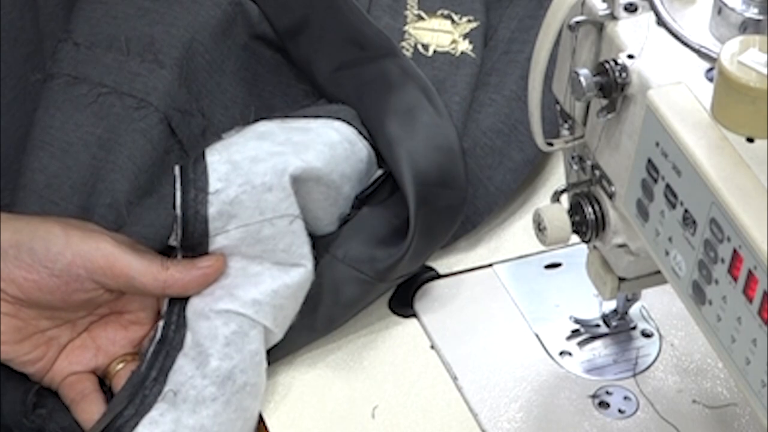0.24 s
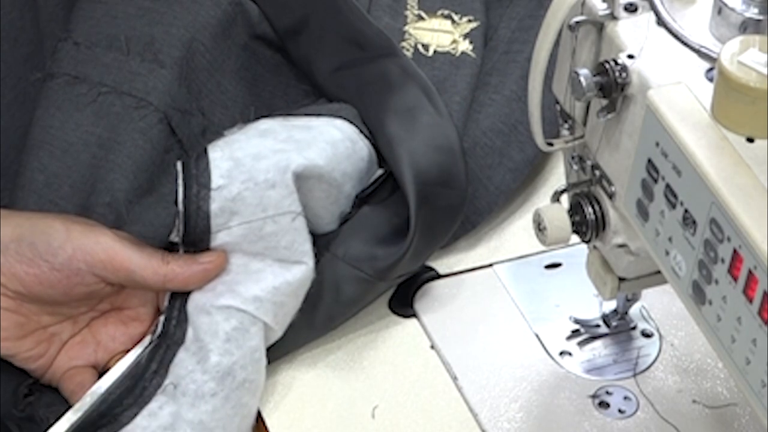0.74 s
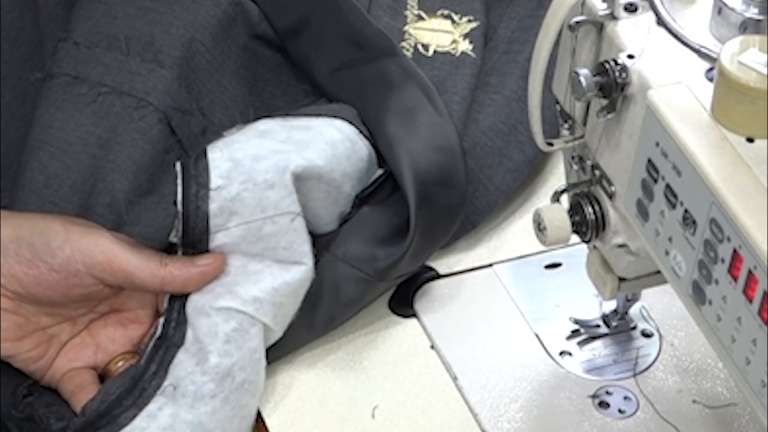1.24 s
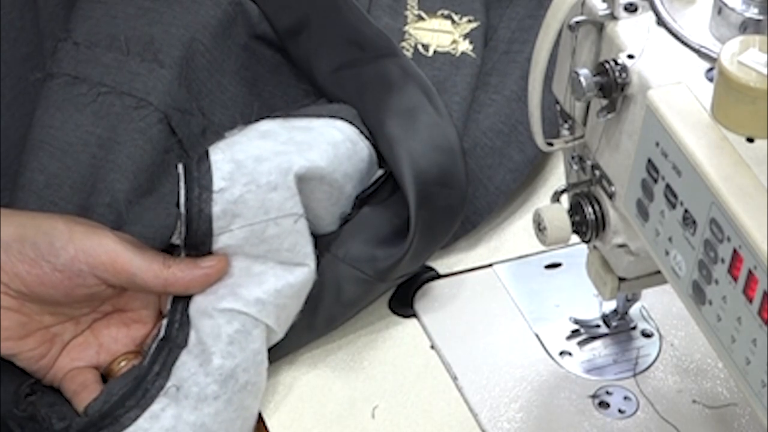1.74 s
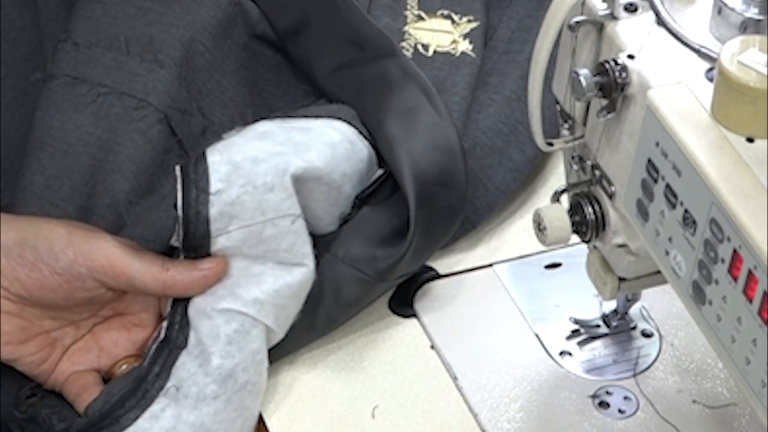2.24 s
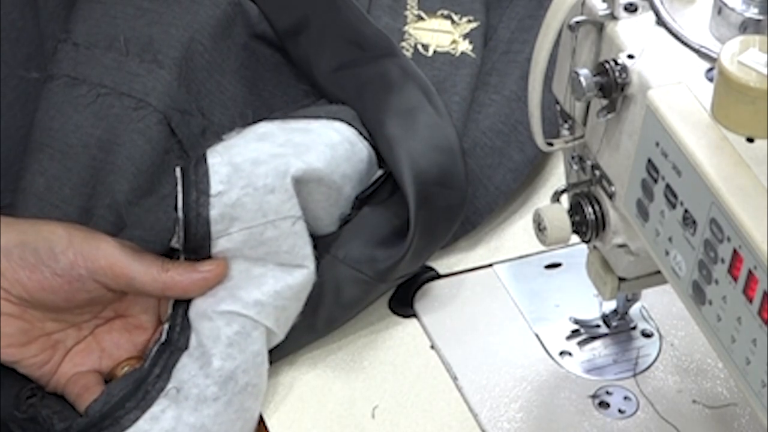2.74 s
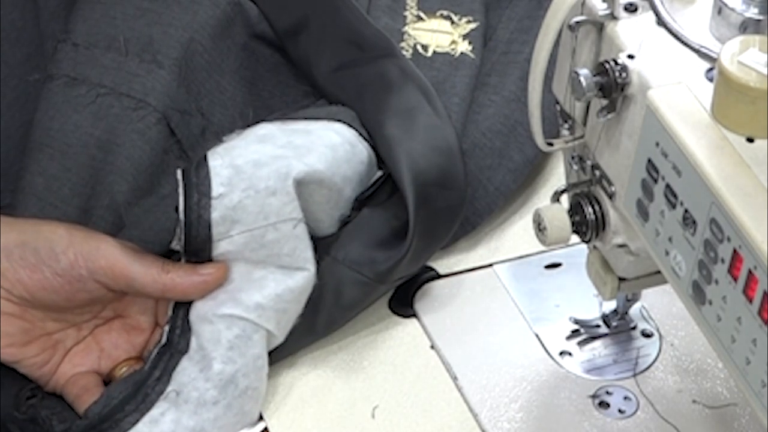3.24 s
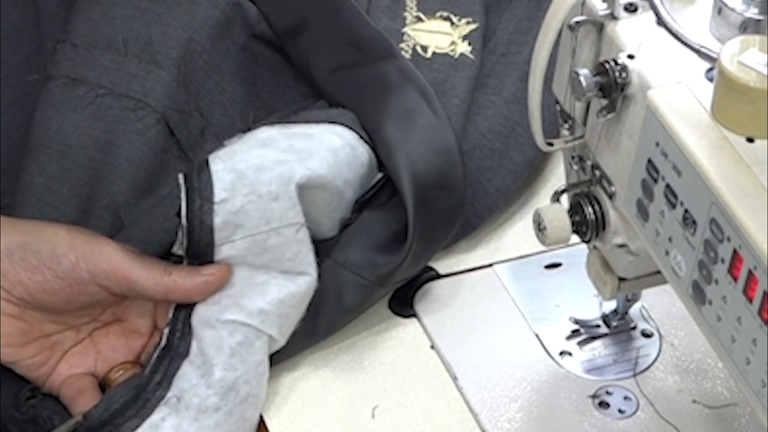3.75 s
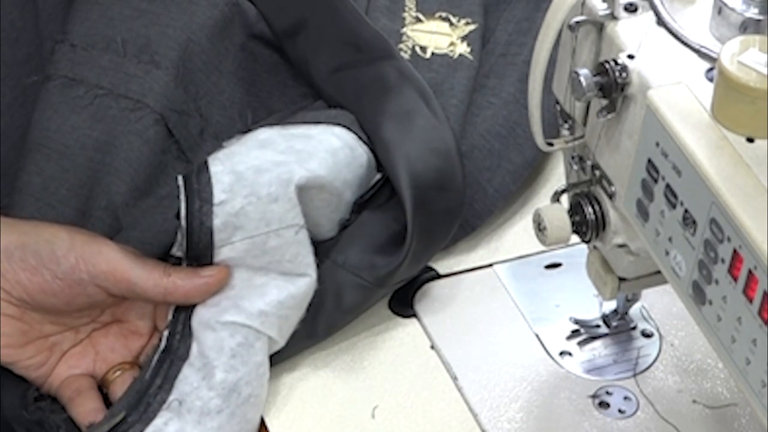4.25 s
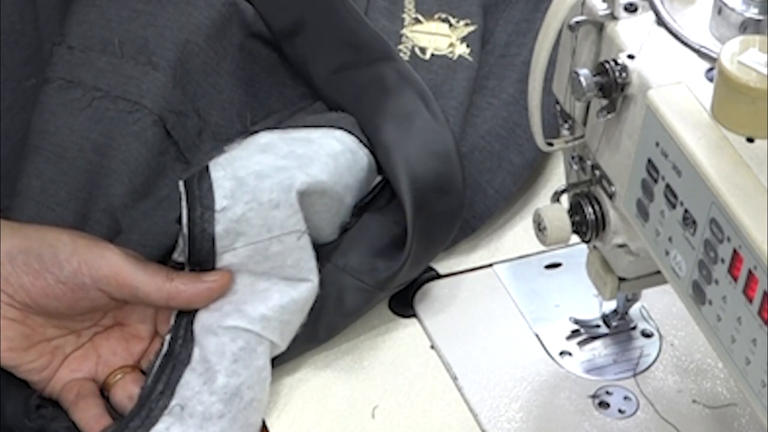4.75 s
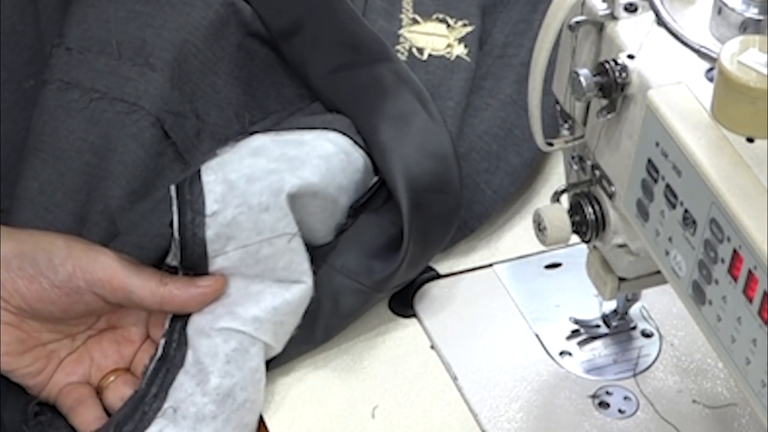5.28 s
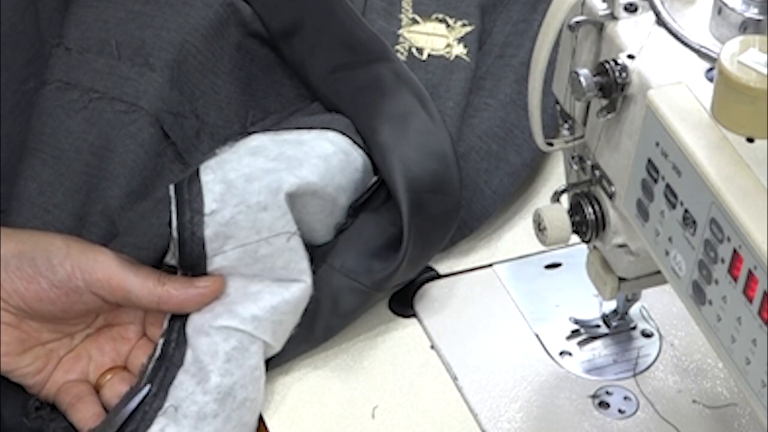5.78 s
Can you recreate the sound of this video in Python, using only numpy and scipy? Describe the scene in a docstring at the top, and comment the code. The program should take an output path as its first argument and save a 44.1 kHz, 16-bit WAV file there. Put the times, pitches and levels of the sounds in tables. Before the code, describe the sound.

Close by, steel scissors trim a jacket seam in a small workshop. Three light snips come first, the blades ringing briefly and rubbing as they reopen. One hard snap with a short grind follows, then three quick, crisp cuts through cloth and a softer last one. An idling sewing machine hums and fans rush throughout, dipping at the hardest snap and slowly swelling back.

```python
"""Steel scissors trim a jacket seam in a small workshop; fans rush and a sewing machine idles throughout.
First come three light snips: the blades snap shut and ring, and rub as they open again.
At 2.3 s the hardest snap drives them past each other, grinding, and ducks the limiter.
Three quick cuts follow, each a bite into cloth, a shear and a snap, then a softer one at 4.7 s.
Meanwhile the limiter lets go and the hum swells back over several seconds."""
import sys
import numpy as np
from scipy import signal
from scipy.fft import rfft, irfft
from scipy.io import wavfile
from scipy.ndimage import uniform_filter1d

SR = 44100
rng = np.random.default_rng(int(sys.argv[2]) if len(sys.argv) > 2 else 0)


def wrap_up_sound(samples):
    """Save the sound to the file named by the first command line argument, as 16-bit audio."""
    columns = np.atleast_2d(samples).T
    # keep every value between -1 and 1, then stretch to whole-number steps
    tamed = np.clip(columns, -1, 1)
    steps = np.round(tamed * 32767).astype(np.int16)
    wavfile.write(sys.argv[1], SR, steps)


N = 265305
TIME = np.arange(N) / SR


def from_db(db):
    """Decibels to gain."""
    return 10 ** (np.asarray(db) / 20)


def unit_rms(x):
    """Scale to rms 1."""
    return x / np.sqrt(np.mean(x ** 2) + 1e-20)


def gain_at(points, hz):
    """Gain from (f/Hz, level/dB) points, interpolated over log frequency."""
    knots_hz, db = np.transpose(points)
    return from_db(np.interp(np.log(hz + 1e-6), np.log(knots_hz), db))


def drift(rate_hz):
    """Slow random line through unit-variance knots."""
    knots = rng.standard_normal(int(N / SR * rate_hz) + 2)
    return np.interp(TIME * rate_hz, np.arange(len(knots)), knots)


def resonate(x, hz, width_hz):
    """Two-pole resonance, peak gain 1."""
    r = np.exp(-np.pi * width_hz / SR)
    b = np.array([1, 0, -1]) * (1 - r * r) / 2
    a = [1, -2 * r * np.cos(2 * np.pi * hz / SR), r * r]
    return signal.lfilter(b, a, x + 1e-18)


def butter(x, hz, kind, order=2):
    """Low-pass or high-pass."""
    return signal.sosfilt(signal.butter(order, min(hz, .45 * SR), kind, fs=SR, output="sos"), x)


def add(out, at_s, sound):
    """Mix a sound into both channels."""
    start = round(at_s * SR)
    out[:, start:start + sound.shape[1]] += sound[:, :N - start]


# fan rush before roll-off: f/Hz, density/(dB per Hz)
FAN_SPECTRUM = [(12, -91), (28, -65), (46, -67), (66, -57.5), (100, -66.5), (140, -57), (188, -64),
                (228, -61.5), (325, -68.5), (450, -64.5), (800, -67.5), (1150, -71.5), (2050, -74.5),
                (4000, -83)]
# hiss before combing: f/Hz, density/(dB per Hz)
HISS_SPECTRUM = [(2000, -112.5), (3800, -86.5), (5500, -82.5), (7300, -81.5), (9000, -84.5), (10300, -87.5),
                 (12800, -86.5), (14200, -93), (16000, -104.5)]
# stereo width: f/Hz, side minus mid/dB
AIR_WIDTH = [(25, -34), (60, -46), (130, -58), (280, -27.5), (550, -18), (1100, -15), (1800, -15),
             (3000, -31.5), (4500, -32.5), (6000, -13.5), (9000, -7), (13000, 2)]

def ventilation(rolloff_hz=4500, comb_decay_s=.012):
    """Fan rush and thin hiss, wider in the treble; hard surfaces nearby comb the hiss."""
    hz = np.linspace(0, SR / 2, N // 2 + 1)
    t = TIME[:SR // 50]
    reflections = rng.standard_normal(len(t)) * np.exp(-t / comb_decay_s) * (t > .002)
    comb = np.abs(.84 + .54 * rfft(reflections / np.linalg.norm(reflections), N))
    rush = gain_at(FAN_SPECTRUM, hz) / np.hypot(1, (hz / rolloff_hz) ** 2)
    hiss = gain_at(HISS_SPECTRUM, hz) * comb
    mid, side = rfft(rng.standard_normal((2, N))) * np.hypot(rush, hiss) * np.sqrt(SR / 2)
    return irfft(mid + gain_at(AIR_WIDTH, hz) * side * [[1], [-1]], N)


# motor and mains hum, faint whine on top: f/Hz, rms level/dB
HUM_LINES = [(61.5, -55), (74, -50), (98, -41), (120, -39.5), (142.2, -39.5), (164, -53.5), (240, -50.5),
             (360, -57.5), (382, -54), (457, -56.5), (840.5, -55.5), (1702, -90), (4334, -66), (5533, -63),
             (5840, -68)]

def motor(waver_db=1.7, wander_rad=.25):
    """Idling motor: steady lines, each wavering in level and phase."""
    out = 0
    for hz, db in HUM_LINES:
        phase = 2 * np.pi * (hz * TIME + rng.random()) + wander_rad * drift(2.983)
        out += np.sqrt(2) * from_db(db + waver_db * drift(4)) * np.sin(phase)
    return out


def room(x, t60_s=.22, level_db=-9, side_db=-17, first_s=.0031, wall_hz=15000):
    """Dense reflections from table, machine and walls, dying quickly among the cloth."""
    t = TIME[:SR // 2]
    decay = from_db(-60 * t / t60_s) * (t > first_s)
    mid, side = butter(rng.standard_normal((2, len(t))), wall_hz, "low", order=1) * decay
    echoes = unit_rms(mid + from_db(side_db) * side * [[1], [-1]]) / np.sqrt(len(t))
    return from_db(level_db) * signal.fftconvolve(x.mean(axis=0)[None], echoes, axes=1)[:, :N]


# blade tip modes: f/Hz, relative level/dB
TIP_MODES = [(4700, -7.5), (6900, -7), (7500, 4), (7930, -10), (8700, -10), (9030, 3), (9760, -5),
             (10950, 18), (12950, -14)]

def tip_ring(x, t60_s=.036, ring_db=-9):
    """The free blade tips ring on softly."""
    width_hz = np.log(1000) / (np.pi * t60_s)
    return sum(from_db(db + ring_db) * resonate(x, hz, width_hz) for hz, db in TIP_MODES)


# closed blades, damped by hand and cloth: f/Hz, width/Hz, level/dB
CLOSED_MODES = [(2350, 86, -28), (3670, 100, -9), (4480, 220, -11), (5100, 84, -4.5), (5820, 510, -9.5),
                (6390, 95, -3), (6900, 140, -2), (7580, 420, 0), (8330, 110, 4), (8800, 340, 1.5),
                (9250, 144, 2.5), (9700, 220, 0), (10440, 780, -7), (12020, 410, 1), (13600, 300, 0),
                (13600, 590, -3.5), (15000, 880, -7)]
# parted blades: f/Hz, width/Hz, level/dB
PARTED_MODES = [(3160, 114, -3), (4530, 190, 0.5), (5500, 280, -9.5), (6260, 120, 0), (6830, 220, -4),
                (7240, 180, -1.5), (8000, 130, -5), (8730, 400, -6.5), (9580, 180, -5), (9900, 450, -16),
                (11370, 280, -8), (12100, 400, -6), (13220, 350, -8.5), (14700, 500, -13)]

def blades(force, modes, crack_db, low_cut_hz=2000):
    """Contact force rings the modes and radiates a direct crack; narrow steel gives little bass."""
    rings = sum((-1) ** k * from_db(db) * resonate(force, hz, width_hz)
                for k, (hz, width_hz, db) in enumerate(modes))
    return butter(rings + from_db(crack_db) * force, low_cut_hz, "high")


def rub(out, at_s, db, half_s, hz, modes=PARTED_MODES, catches_per_s=5000):
    """Edges catch and slip in dense tiny grains under one swell of pressure."""
    t = np.arange(-3 * half_s, 6 * half_s, 1 / SR)
    pressure = np.exp(-(t / half_s) ** 2 / 2)
    grains = rng.standard_normal(SR) * (rng.random(SR) < catches_per_s / SR)
    steel = blades(grains[:len(t)] * pressure, modes, crack_db=-18)
    scrape = unit_rms(resonate(steel, hz, width_hz=2000) + .4 * steel)
    add(out, at_s + t[0], from_db(db) * scrape[None] * np.sqrt(np.mean(pressure ** 2)))


# knocks on the stop: t/s, level/dB, half length/s
STOP_KNOCKS = [(0.524, -39, 0.011), (1.003, -38, .0077), (2.172, -26.5, .0014), (2.635, -21.5, .0019),
               (2.932, -22.5, 0.0027), (3.222, -23, .003), (3.514, -37.5, .012), (4.583, -41, 0.0044),
               (4.877, -40, 0.0055)]

def openings(slide_lead_s=.014):
    """The edges slide apart, soft and bright, then knock against their stop."""
    out = np.zeros((2, N))
    for at_s, db, half_s in STOP_KNOCKS:
        rub(out, at_s - slide_lead_s, db - 14, half_s=.005, hz=8900)
        rub(out, at_s, db, half_s, hz=7800)
    return out


# bites into cloth: t/s, level/dB, half length/s
CLOTH_BITES = [(2.7336, -22.5, 0.0016), (3.027, -20.5, .0028), (3.303, -19, .0032), (4.683, -35.5, .004)]

def cuts():
    """The edges bite into the cloth and shear on towards the next snap."""
    out = np.zeros((2, N))
    for at_s, db, half_s in CLOTH_BITES:
        shut_s, shut_db = next(snap[:2] for snap in SNAPS if snap[0] > at_s)
        stroke_s = shut_s - at_s
        rub(out, at_s, db, half_s, hz=7900)
        rub(out, at_s + .8 * stroke_s, shut_db - 30.5, half_s=.3 * stroke_s, hz=9000)
    return out


# grinds after the hardest snap: delay/s, level/dB, half length/s, f/Hz
GRINDS = [(0.047, -21.5, 0.023, 4700), (0.068, -24.5, 0.016, 9400)]

def overrun():
    """The hardest snap drives the blades past each other; they grind to rest."""
    out = np.zeros((2, N))
    hardest_s = max(SNAPS, key=lambda snap: snap[1])[0]
    for delay_s, db, half_s, hz in GRINDS:
        rub(out, hardest_s + delay_s, db, half_s, hz, CLOSED_MODES)
    return out


def chatter(length_s, grit=.11, bounce=.67, bounces=4):
    """Closing force: first contact, weaker bounces and the grit of parting fibres."""
    t = TIME[:2048]
    force = grit * rng.standard_normal(len(t)) * np.exp(-t / length_s)
    when = (np.arange(bounces) + rng.uniform(.4, 1, bounces)) / bounces
    kicks = bounce * rng.choice([-1, 1], bounces) * np.exp(-when ** 2)
    force[(when * length_s * SR).astype(int)] += kicks
    force[0] += 1
    return force


# blade closings: t/s, level over 3 ms/dB, chatter/s, main ring f/Hz, level/dB,
# second ring f/Hz, level/dB, left minus right/dB
SNAPS = [(0.0553, -21, 0.0013, 8540, 6, 4380, 3, -1), (0.8151, -18.5, 0.0017, 6430, 1.5, 3600, -8, -1),
         (1.1676, -17, .0035, 6710, 9, 3420, -1, -1.5), (2.327, 7, 0.0022, 9300, -4, 2400, -6, 1),
         (2.7591, 0, .0016, 9300, 6, 7960, 5, -1), (3.0467, 1, .0022, 9000, 7, 11600, 8.5, -1),
         (3.3202, 3, 0.0031, 8020, 9, 3720, -7, -1), (4.7274, -4.5, 0.0015, 8900, 6.5, 4420, -4, 0)]

def snaps(ring_q=29, crack_db=-22, side_db=-13, send_db=-3.5, bright_hz_per_db=198):
    """Each closing meets at another spot and adds two rings of its own; returns direct and room feed."""
    direct, room_feed = np.zeros((2, N)), np.zeros((2, N))
    for at_s, db, chatter_s, main_hz, main_db, second_hz, second_db, pan_db in SNAPS:
        top_hz = 13000 + bright_hz_per_db * db  # harder is brighter
        body = butter(blades(chatter(chatter_s), CLOSED_MODES, crack_db), top_hz, "low")
        main = from_db(main_db) * resonate(chatter(chatter_s), main_hz, main_hz / ring_q)
        second = from_db(second_db) * resonate(chatter(chatter_s), second_hz, second_hz / ring_q)
        snap = unit_rms(body + main + second)
        # the table top scatters differently to each ear: width, no shift of direction
        scatter = blades(chatter(chatter_s, grit=.15), CLOSED_MODES, crack_db)
        side = from_db(side_db) * unit_rms(scatter - snap * np.mean(scatter * snap))
        gain = from_db(db) * np.sqrt(.003 * SR / len(snap))
        pan = from_db([[pan_db / 2], [-pan_db / 2]])
        add(direct, at_s, gain * np.array([snap + side, snap - side]) * pan)
        # the room gathers all directions: a more even colour
        even = butter(blades(signal.unit_impulse(len(snap)), CLOSED_MODES, crack_db), top_hz, "low")
        diffuse = unit_rms(unit_rms(even) + .7 * snap)
        add(room_feed, at_s, gain * from_db(send_db) * diffuse[None])
    return direct, room_feed


def scene():
    """Scissors close by; room, machine and fans behind."""
    direct, room_feed = snaps()
    scrapes = openings() + cuts() + overrun()
    scissors = direct + scrapes
    return scissors + tip_ring(scissors) + room(room_feed + scrapes) + motor() + ventilation()


def limiter(x, threshold_db=-10.5, release_db_per_s=4.5, ahead_s=.016, attack_s=.014):
    """Looks ahead, ducks fast under a loud snap, releases slowly."""
    power = uniform_filter1d(np.mean(x ** 2, axis=0), size=132)  # 3 ms
    over_db = np.maximum(10 * np.log10(np.maximum(power, 1e-12)) - threshold_db, 0)
    release_db = release_db_per_s * TIME
    held_db = np.maximum.accumulate(over_db + release_db) - release_db
    early_db = np.interp(TIME + ahead_s, TIME, held_db)
    pole = np.exp(-1 / (attack_s * SR))
    duck_db = signal.lfilter([1 - pole], [1, -pole], early_db)
    return x * from_db(-duck_db)


def record(dry):
    """Limiter, soft clip, steep low-pass."""
    ceiling, cutoff_hz = .95, 15850
    rounded = ceiling * np.tanh(limiter(dry) / ceiling)
    return signal.sosfilt(signal.ellip(10, .2, 80, cutoff_hz, fs=SR, output="sos"), rounded)


dry = scene()
out = record(dry)
wrap_up_sound(out)
```